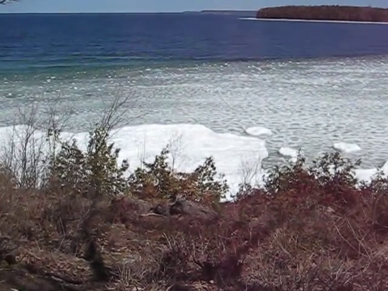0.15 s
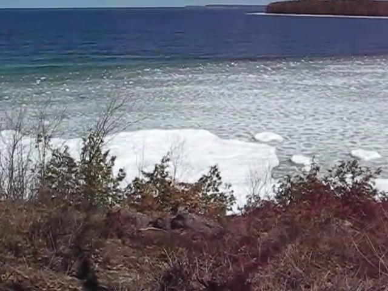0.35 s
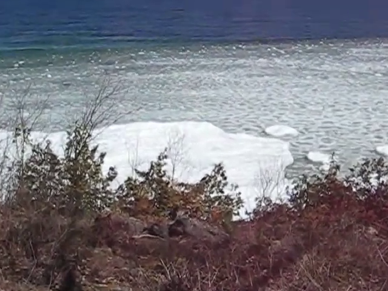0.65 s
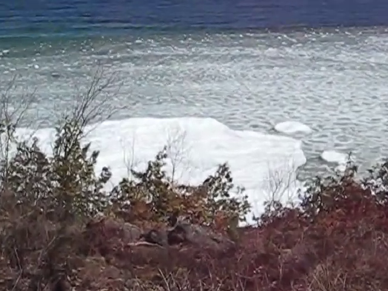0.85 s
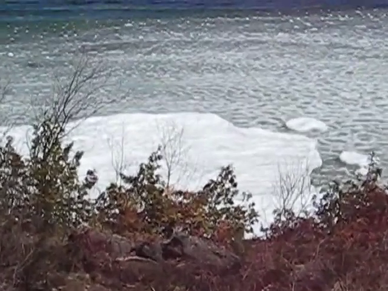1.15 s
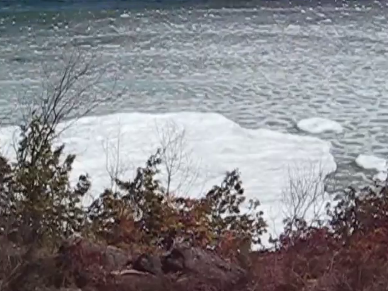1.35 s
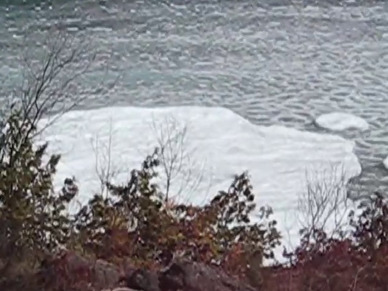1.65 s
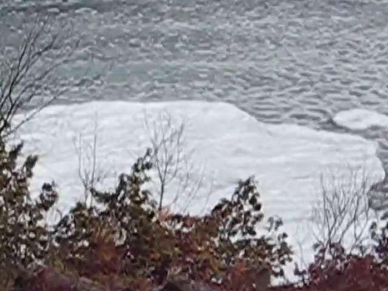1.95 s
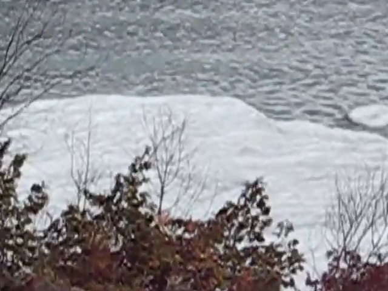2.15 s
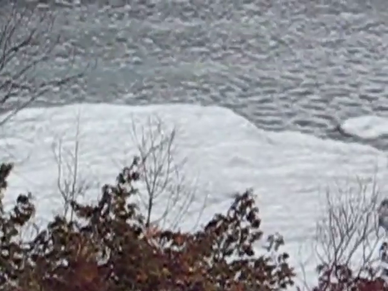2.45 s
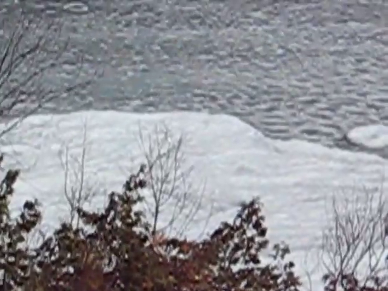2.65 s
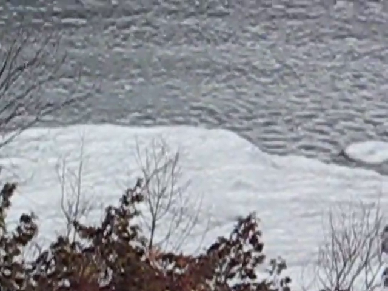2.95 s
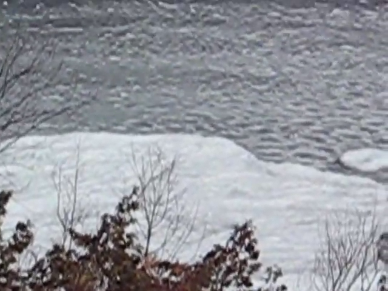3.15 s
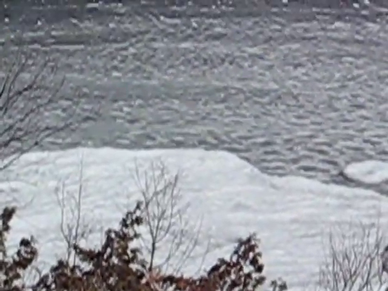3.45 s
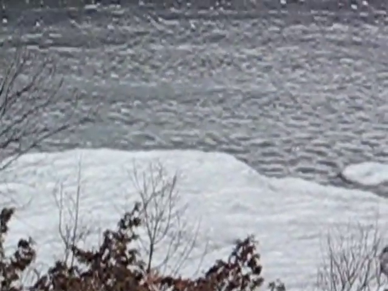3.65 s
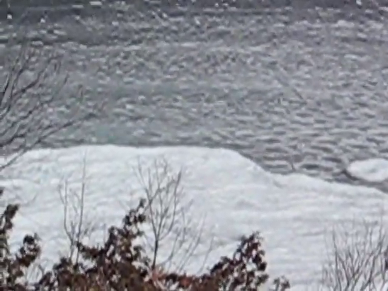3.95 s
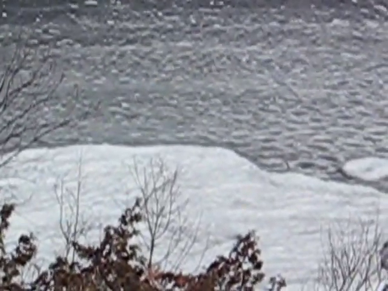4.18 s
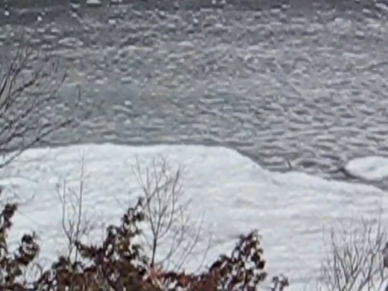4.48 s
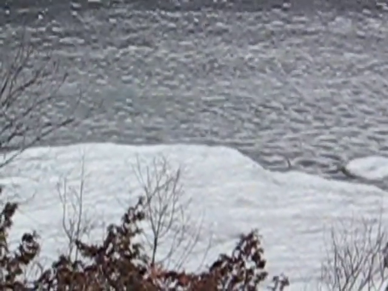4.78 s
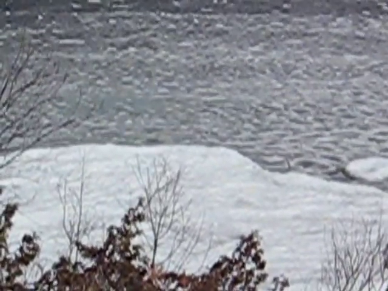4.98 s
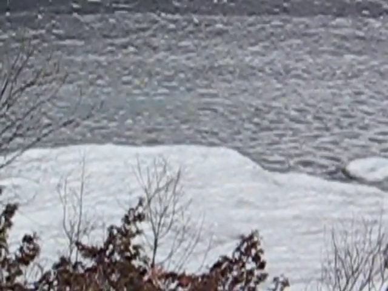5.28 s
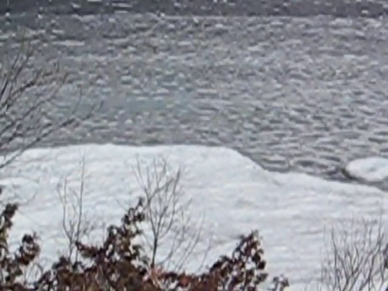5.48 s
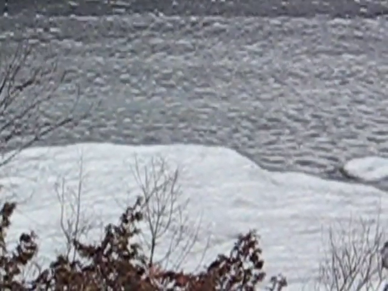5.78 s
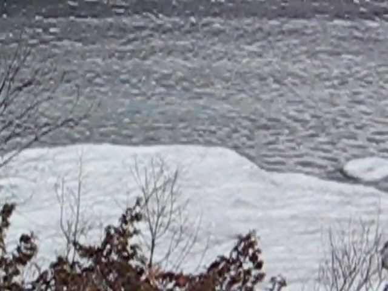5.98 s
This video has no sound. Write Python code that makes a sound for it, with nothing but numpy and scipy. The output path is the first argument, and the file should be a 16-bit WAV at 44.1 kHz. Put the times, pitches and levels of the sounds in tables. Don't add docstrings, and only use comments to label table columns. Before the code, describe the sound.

A wide icy lake shore heard through one small camera microphone. Rolling water and spray surge over the steady wash, peaking around one second, followed by foam fizz and a quick drain to a faint trickle. Fingers snap a button near two seconds, then knock the case a few times. Afterward there is mostly even watery hiss, gently sinking, with tiny air thumps and very light wind rumble.

```python
import sys
import numpy as np
from scipy import signal
from scipy.io import wavfile
from scipy.ndimage import uniform_filter1d

SR = 44100
rng = np.random.default_rng(int(sys.argv[2]) if len(sys.argv) > 2 else 0)


def materialize(psi):
    bounded = np.clip(np.atleast_2d(psi).T, -1, 1)
    quanta = np.round(bounded * 32767).astype(np.int16)
    wavfile.write(sys.argv[1], SR, quanta)


def volts_from_db(level):
    exponent = np.asarray(level, float) / 20
    return 10 ** exponent


N = 269892
TIME = np.arange(N) / SR


def evened(x):
    return x / np.sqrt(np.mean(x ** 2) + 1e-20)


def add(mix, s, sound):
    part = mix[round(s * SR):][:len(sound)]
    part += sound[:len(part)]


def bump(s, length):
    return np.exp(-((TIME - s) / length) ** 2)


def hiss(spectrum, patchy_db, patch_bins, patch_frames):
    size, hop = 1024, 256
    hz = np.fft.rfftfreq(size, 1 / SR)
    real, imag, patches = rng.standard_normal((N // hop + 5, len(hz), 3)).T
    patches = uniform_filter1d(patches, round(patch_bins), axis=0)
    patches = uniform_filter1d(patches, round(patch_frames), axis=1)
    f, db = np.transpose(spectrum)
    colour_db = np.interp(np.log(hz + 1), np.log(f + 1), db, left=-70, right=-70)
    z = (real + 1j * imag) * volts_from_db(colour_db[:, None] + patchy_db * evened(patches))
    return evened(signal.istft(z, nperseg=size, noverlap=size - hop)[1][:N])


def breaking(crest_db, build_db, crest_s, drain_s, drain_db):
    build = build_db * np.maximum(crest_s - TIME, 0)
    drain = drain_db * np.maximum(TIME - drain_s, 0)
    return crest_db - build - drain


# f/Hz, level/dB [per Hz]
FAR_COLOUR = [(30, -37), (100, -21.5), (250, -16), (450, -14), (650, -11), (950, -5.5), (1400, -6),
              (2050, -1), (3300, -.5), (4700, -3), (6400, -5.5), (9000, -18.5), (12000, -23),
              (15700, -34.5)]


def far_wash():
    level_db, sag_s, sag_db_per_s = -27.5, 3.56, 0.62
    sag_db = sag_db_per_s * np.maximum(TIME - sag_s, 0)
    return volts_from_db(level_db - sag_db) * hiss(FAR_COLOUR, 0.15, 14, 22)


# t/s, tumble level/dB [gain], spray level/dB [gain]
SURGES = [
    (.2, 0.8, 2.5),
    (.6, 1, 2.5),
    (1.0, 3, 1),
    (1.35, 0.5, 1.5),
    (1.74, 0.2, 1),
    (2.2, .5, -0.7),
]


def surges():
    length_s = 0.13
    tumble_db = sum(db * bump(s, length_s) for s, db, _ in SURGES)
    spray_db = sum(db * bump(s, length_s) for s, _, db in SURGES)
    return tumble_db, spray_db


# f/Hz, level/dB [per Hz]
TUMBLE_COLOUR = [(250, -26), (380, -20), (520, -3.5), (900, 2), (1500, 4), (2200, 3.5), (3000, -8),
                 (4000, -15), (6000, -8)]
# crest level/dB, build [dB per s], crest t/s, drain start t/s, drain [dB per s]
TUMBLE_SHAPE = (-27.5, 3, 0.2, 1.9, 16)


def tumble(surge_db):
    backwash_db, backwash_end_s, fade_db_per_s = -39.5, 3.5, 9
    trickle_db = backwash_db - fade_db_per_s * np.maximum(TIME - backwash_end_s, 0)
    level_db = np.maximum(breaking(*TUMBLE_SHAPE), trickle_db) + surge_db
    return volts_from_db(level_db) * hiss(TUMBLE_COLOUR, 1.22, 12, 24)


# f/Hz, level/dB [per Hz]
SPRAY_COLOUR = [(1200, -41), (2000, -3), (3100, 1), (4000, -3.5), (4800, -9.5), (6500, -24)]
# crest level/dB, build [dB per s], crest t/s, drain start t/s, drain [dB per s]
SPRAY_SHAPE = (-25, 5.5, 1.22, 1.96, 13.5)


def spray(surge_db):
    return volts_from_db(breaking(*SPRAY_SHAPE) + surge_db) * hiss(SPRAY_COLOUR, 0.75, 22, 14.4)


# f/Hz, level/dB [per Hz]
FIZZ_COLOUR = [(3500, -14), (4800, -1.5), (6000, 0.5), (7500, -4), (8400, -8), (9500, -18.5), (12500, -22),
               (15700, -41)]
# crest level/dB, build [dB per s], crest t/s, drain start t/s, drain [dB per s]
FIZZ_SHAPE = (-28, 6.5, 1.2, 2.3, 22)


def fizz():
    collapse_s, collapse_db = 1.68, -5
    burst = (1 + np.tanh((TIME - collapse_s) / .04)) / 2
    return volts_from_db(breaking(*FIZZ_SHAPE) + collapse_db * burst) * hiss(FIZZ_COLOUR, 1.2, 30, 13.7)


# f/Hz, level/dB [per Hz]
WIND_COLOUR = [(10, -3), (30, -2), (70, -4), (140, -16), (260, -25)]
# t/s, rise level/dB, length [s]
GUSTS = [
    (1.6, 4, 1),
    (3.7, 6.5, 0.24),
    (4.12, 8, .12),
    (4.6, 9.5, 0.33),
    (5.7, 5, .3),
]


def wind():
    calm_db = -69
    level_db = calm_db + sum(db * bump(s, length) for s, db, length in GUSTS)
    return volts_from_db(level_db) * hiss(WIND_COLOUR, 3, 3, 12)


# t/s, low mode f/Hz, level/dB, high mode f/Hz, level/dB
KNOCKS = [
    (.3515, 280, -8.5, 600, -40),
    (1.889, 290, -8, 600, -40),
    (1.9254, 290, -1.5, 1550, -5.5),
    (1.9267, 630, -2.5, 1130, -.5),
    (2.3731, 540, 7, 765, 0),
    (2.3775, 1150, -5, 590, -9),
    (3.0557, 434, 3.4, 750, -7),
    (3.1393, 386, -5, 700, -22),
]


def knocks():
    low_t60_s, high_t60_s = .0073, .015
    out, t = np.zeros(N), np.arange(3000) / SR
    soft_onset = 1 - np.exp(-t / .003)
    for s, low_hz, low_db, high_hz, high_db in KNOCKS:
        low = volts_from_db(low_db - 60 * t / low_t60_s) * np.cos(2 * np.pi * low_hz * (t - .0015))
        high = volts_from_db(high_db - 60 * t / high_t60_s) * np.sin(2 * np.pi * high_hz * t)
        add(out, s, (low - high) * soft_onset)
    small_case_hz = 130
    return signal.lfilter(*signal.butter(3, small_case_hz, "high", fs=SR), out)


# t/s, peak level/dB, length [s], direction [signed factor]
PUFFS = [
    (0.436, -38, .005, -1),
    (.439, -44, .006, 1),
    (0.443, -41, .005, -1),
    (.456, -46, 0.011, 1),
    (.4665, -29.5, 0.0028, -1.04),
    (3.301, -46, .006, -1),
    (4.309, -40, .006, 1),
    (4.829, -31, 0.0059, -1.1),
    (4.865, -39, .0056, -1),
]


def puffs():
    out, t = np.zeros(N), np.arange(3000) / SR
    lead_s = .02
    for s, db, length, direction in PUFFS:
        u = (t - lead_s) / length * 3
        push = np.exp(-u ** 2) - 0.16 * np.exp(-(u / 4) ** 2)
        add(out, s - lead_s, direction * volts_from_db(db) * push)
    return out


# t/s, level/dB
SNAP = (1.9255, -27)


def button_snap():
    out, t = np.zeros(N), np.arange(3000) / SR
    s, db = SNAP
    add(out, s, volts_from_db(db - 60 * t / 0.0044) * rng.standard_normal(len(t)))
    return out


def scene():
    tumble_surge_db, spray_surge_db = surges()
    shore = far_wash() + tumble(tumble_surge_db) + spray(spray_surge_db) + fizz()
    handling = wind() + knocks() + puffs() + button_snap()
    return np.tile(shore + handling, (2, 1))


def treble_patches(mono):
    per_s, top_hz = 4.1, 15676
    half, first = 1024, 947
    side, n = np.zeros(N), np.arange(2 * half)
    window = np.sin(np.pi * (n + .5) / (2 * half))
    count = round(per_s * N / SR)
    for k, (when, where, wide) in enumerate(rng.random((count, 3))):
        start = first + half * int((k + when) / count * ((N - first) // half - 2))
        spread = (k * (np.sqrt(5) - 1) / 2 + where / count) % 1
        low_hz = np.interp(spread, (0, 1), (4200, 14500))
        high_hz = min(low_hz + np.interp(wide, (0, 1), (1200, 2300)), top_hz)
        bins = np.arange(round(low_hz * 2 * half / SR), round(high_hz * 2 * half / SR))
        waves = window * np.cos(np.pi / half * np.outer(bins + .5, n + .5 + half / 2))
        level = np.sqrt(np.mean((waves @ mono[start:start + 2 * half]) ** 2))
        noise = rng.standard_normal(len(bins)) @ waves
        add(side, start / SR, volts_from_db(-5) * level * 2 / half * noise)
    return side


def band_limit(x):
    return signal.sosfilt(signal.butter(12, 15730, fs=SR, output="sos"), x)


def record(dry):
    mix = dry + treble_patches(dry[0]) * [[1], [-1]]
    return band_limit(mix)


dry = scene()
out = record(dry)
materialize(out)
```